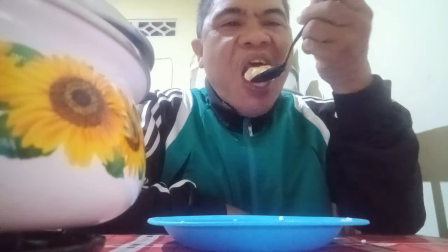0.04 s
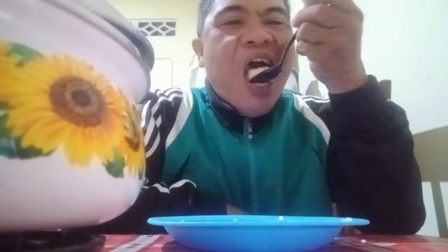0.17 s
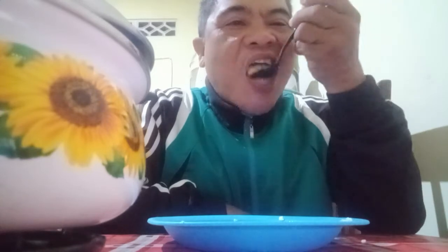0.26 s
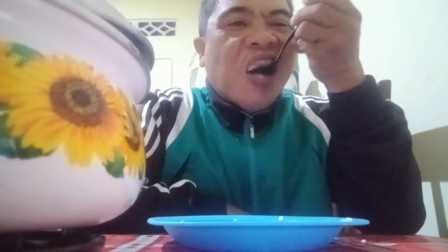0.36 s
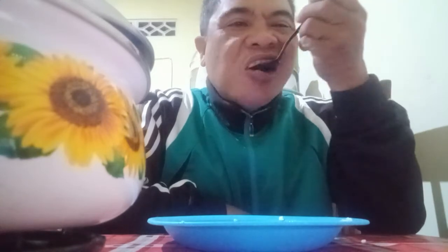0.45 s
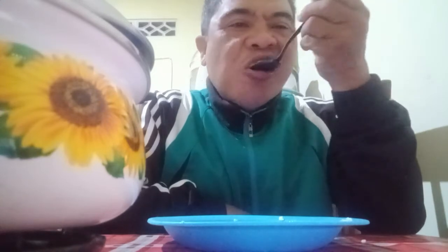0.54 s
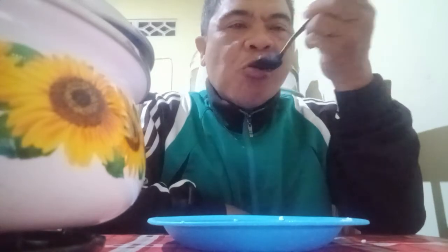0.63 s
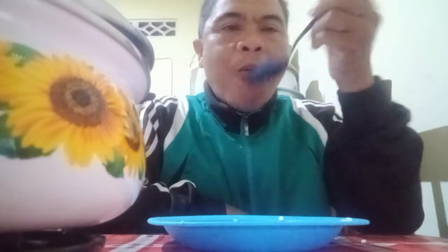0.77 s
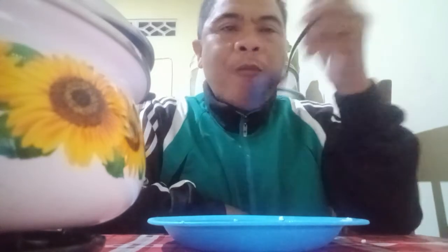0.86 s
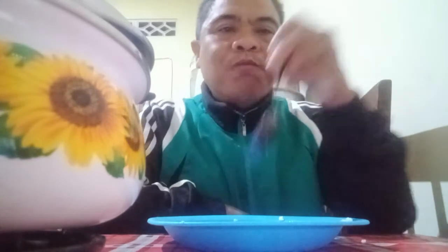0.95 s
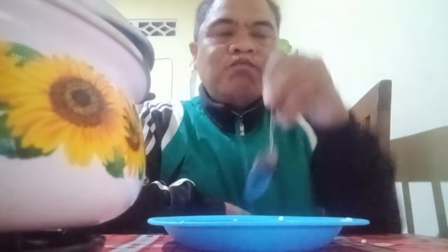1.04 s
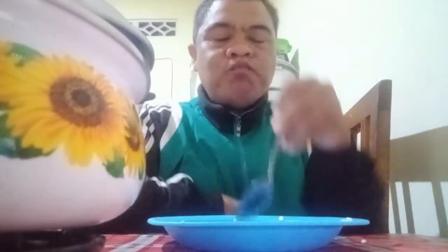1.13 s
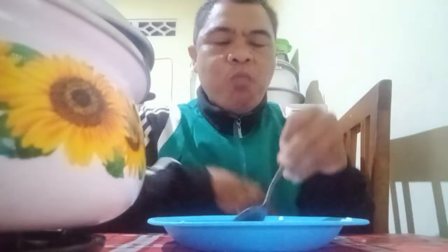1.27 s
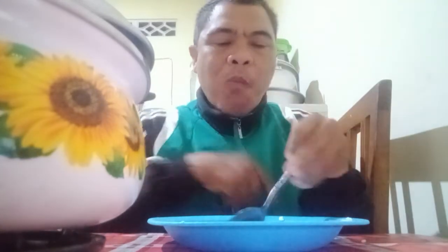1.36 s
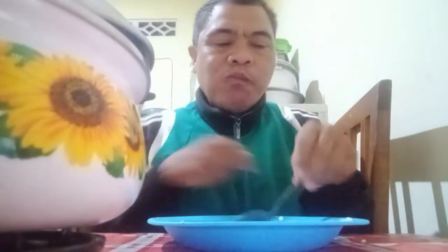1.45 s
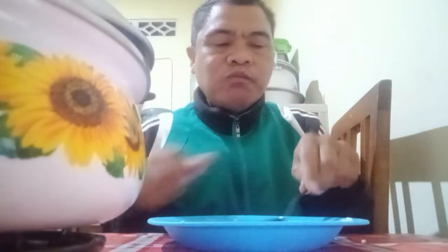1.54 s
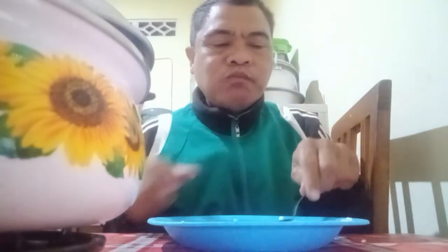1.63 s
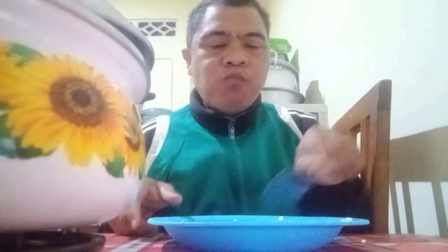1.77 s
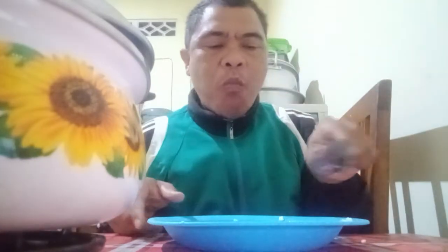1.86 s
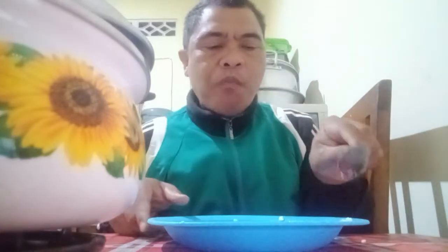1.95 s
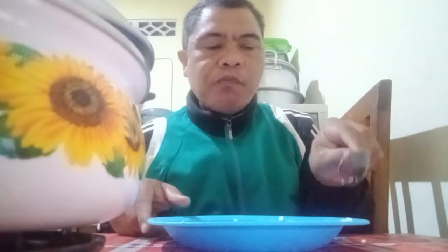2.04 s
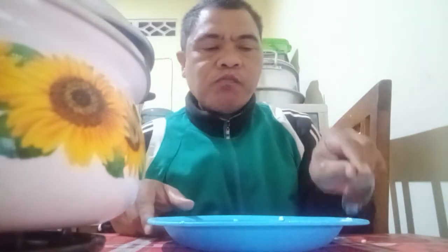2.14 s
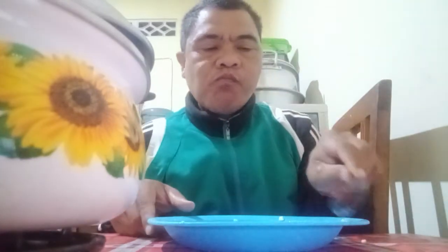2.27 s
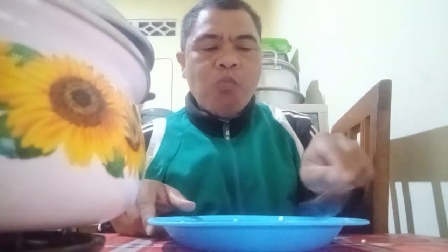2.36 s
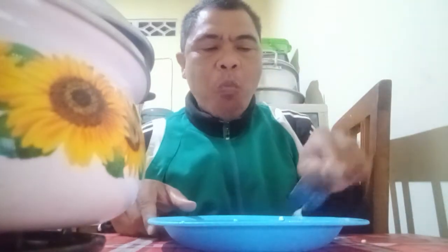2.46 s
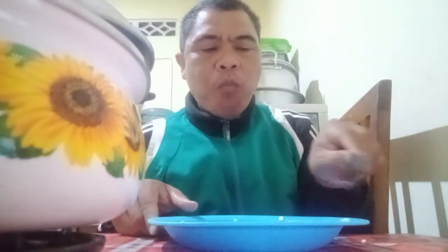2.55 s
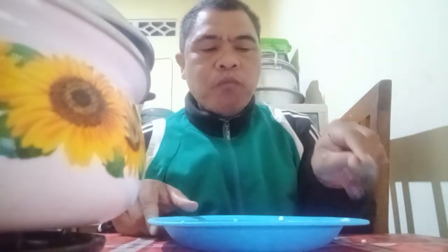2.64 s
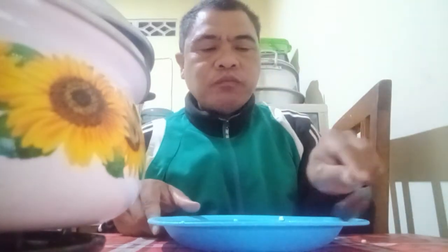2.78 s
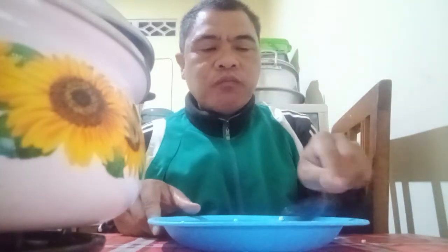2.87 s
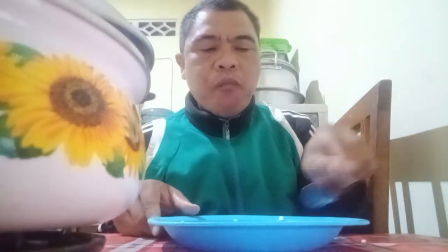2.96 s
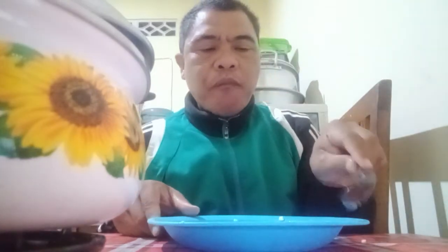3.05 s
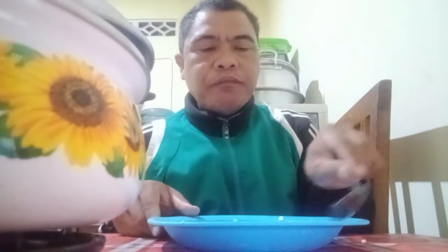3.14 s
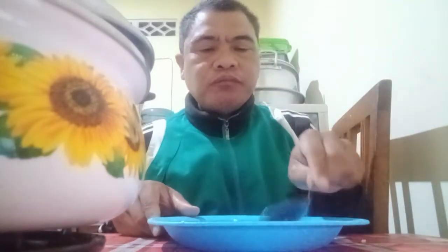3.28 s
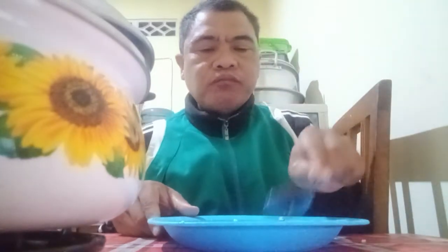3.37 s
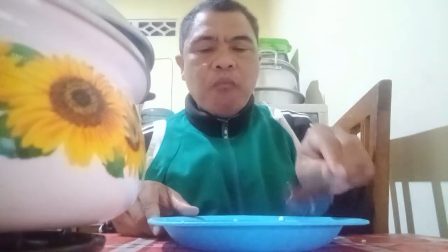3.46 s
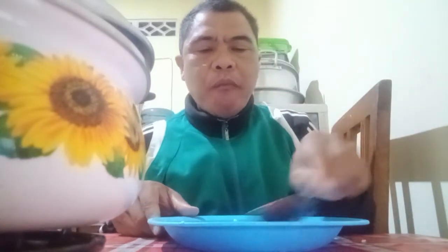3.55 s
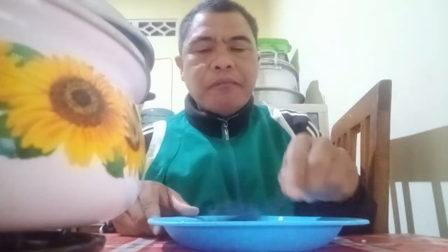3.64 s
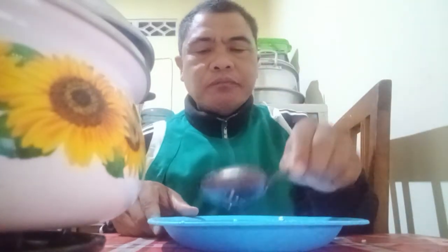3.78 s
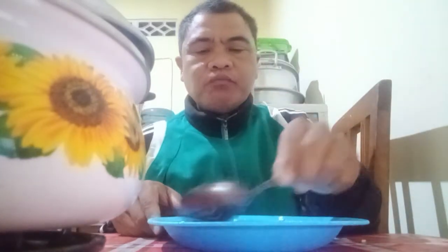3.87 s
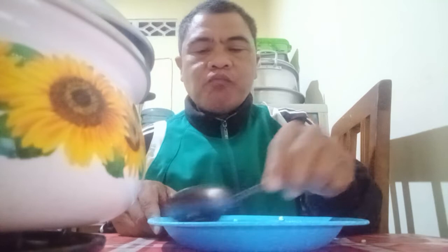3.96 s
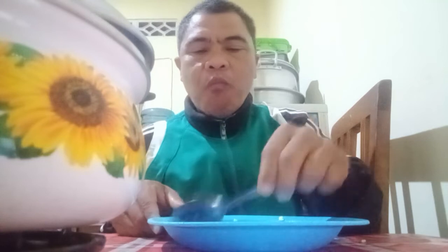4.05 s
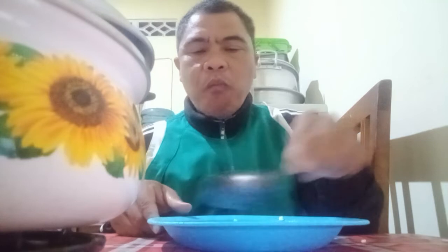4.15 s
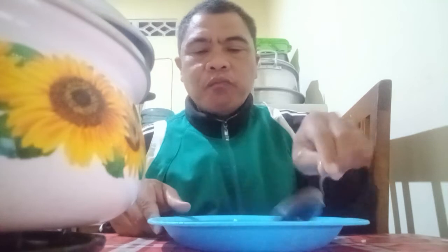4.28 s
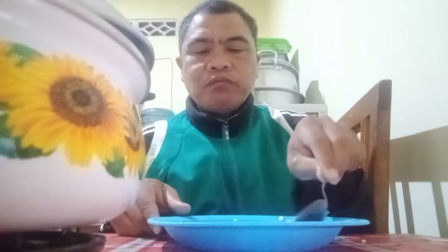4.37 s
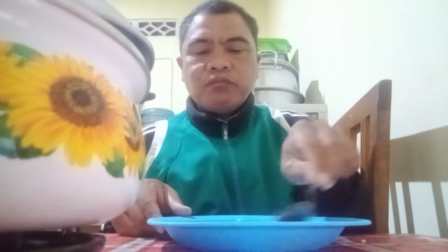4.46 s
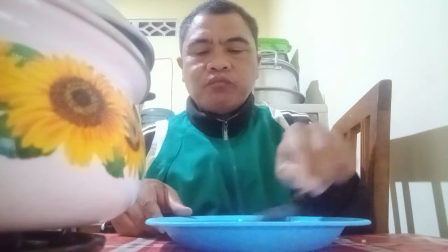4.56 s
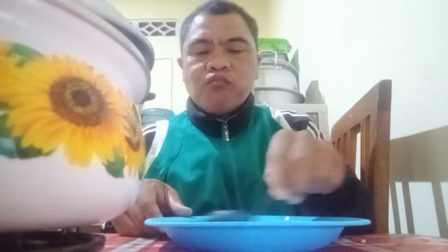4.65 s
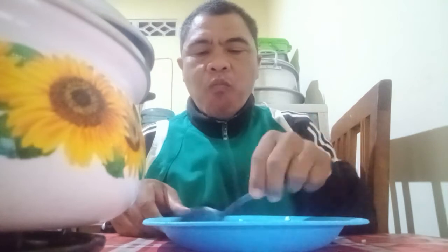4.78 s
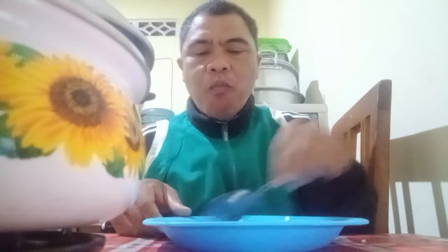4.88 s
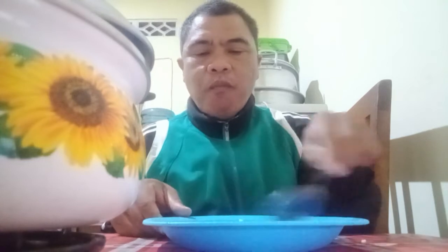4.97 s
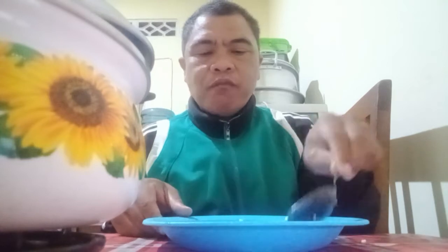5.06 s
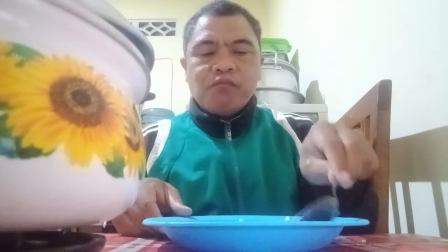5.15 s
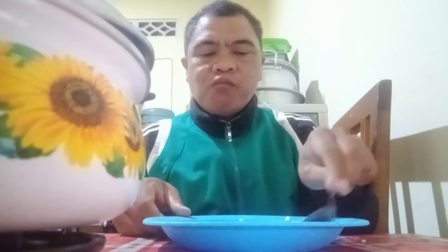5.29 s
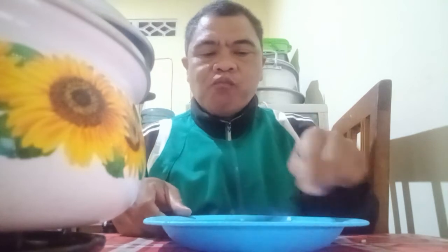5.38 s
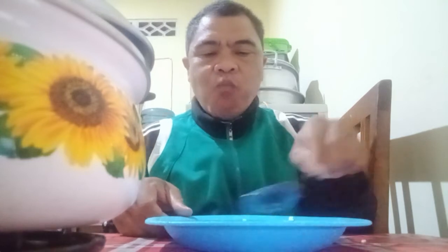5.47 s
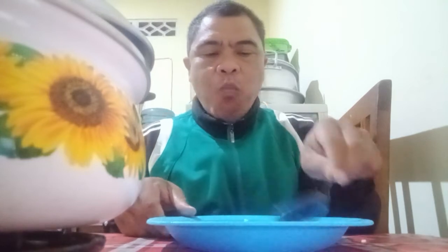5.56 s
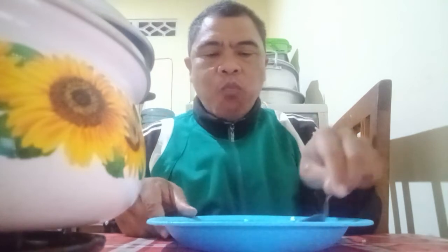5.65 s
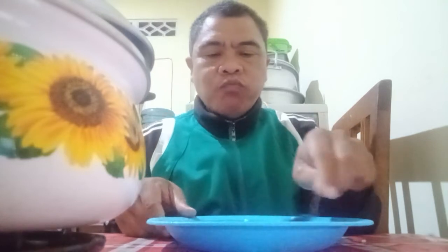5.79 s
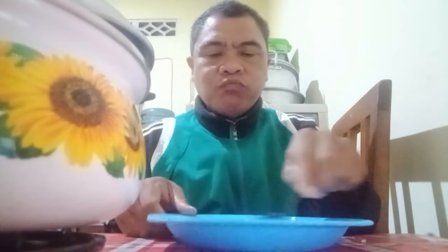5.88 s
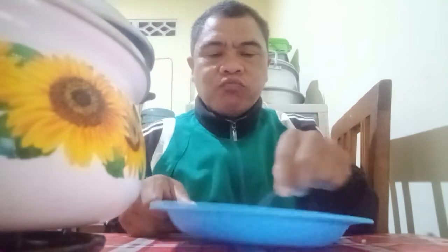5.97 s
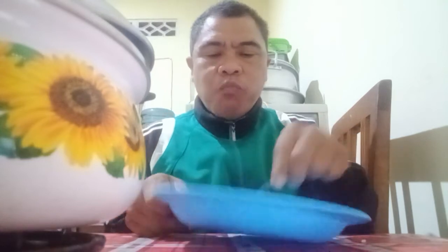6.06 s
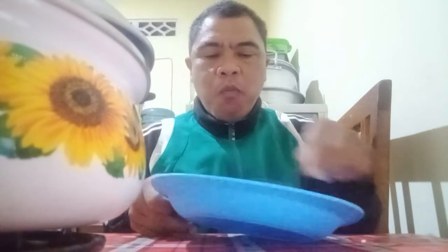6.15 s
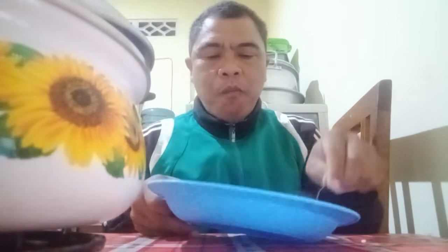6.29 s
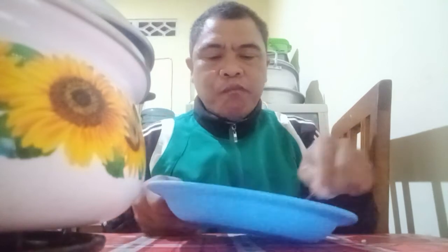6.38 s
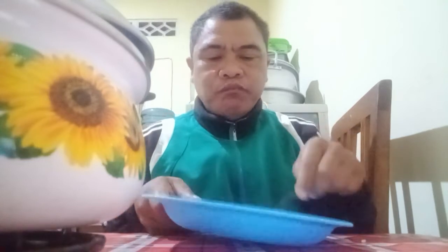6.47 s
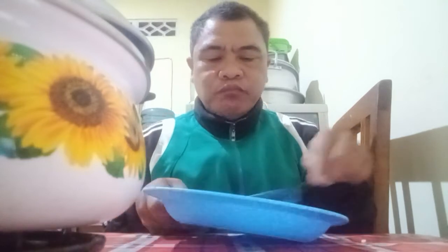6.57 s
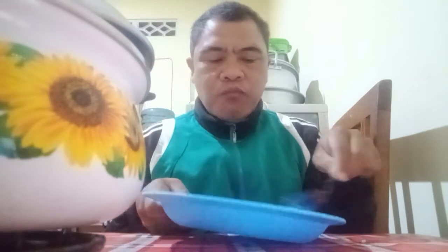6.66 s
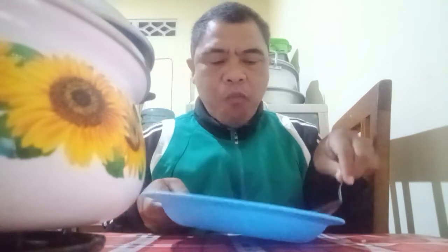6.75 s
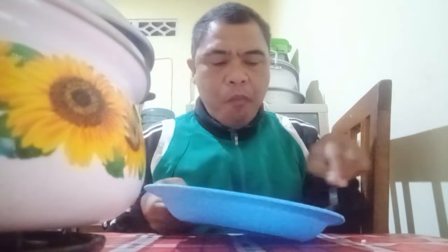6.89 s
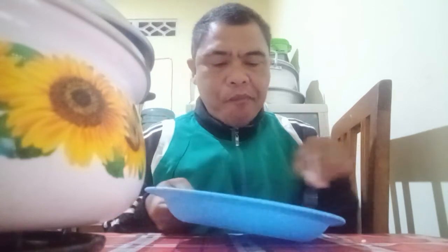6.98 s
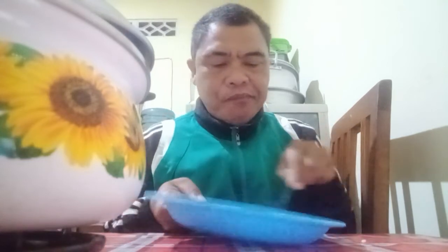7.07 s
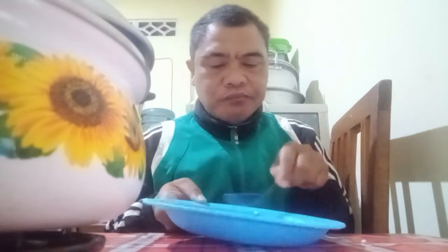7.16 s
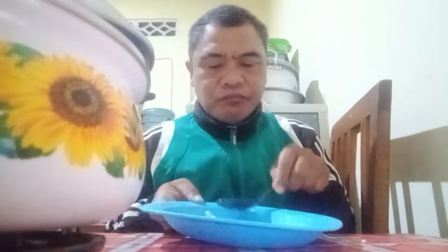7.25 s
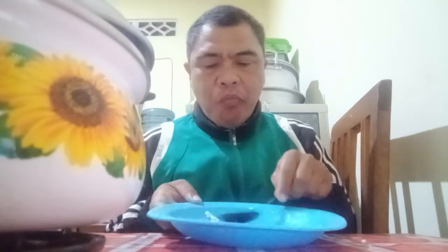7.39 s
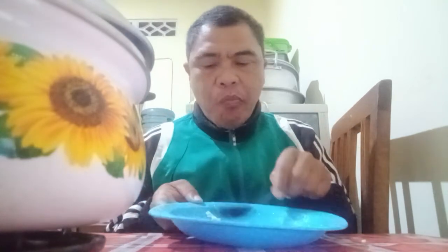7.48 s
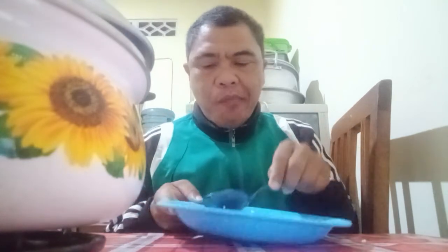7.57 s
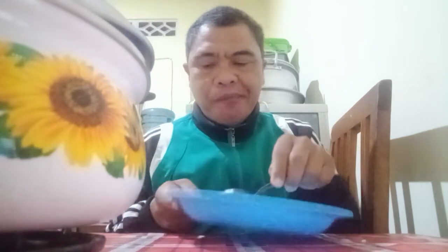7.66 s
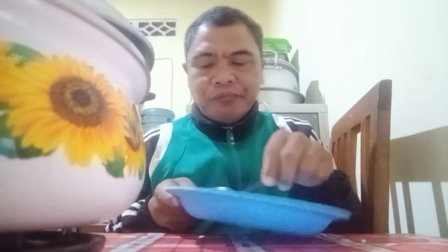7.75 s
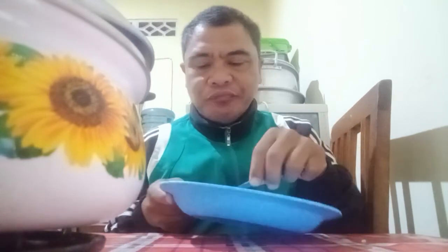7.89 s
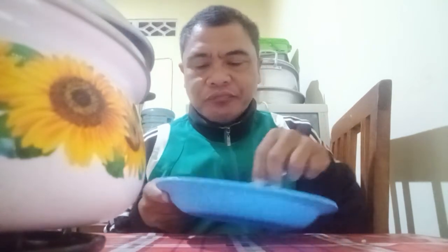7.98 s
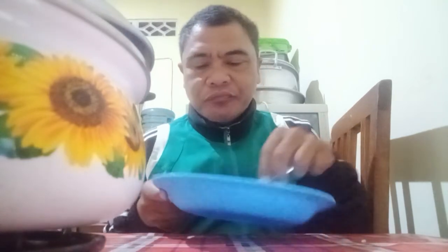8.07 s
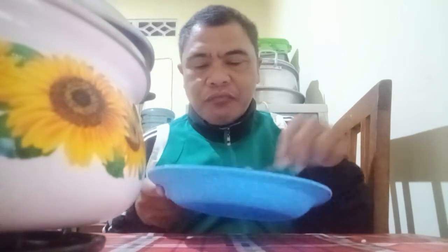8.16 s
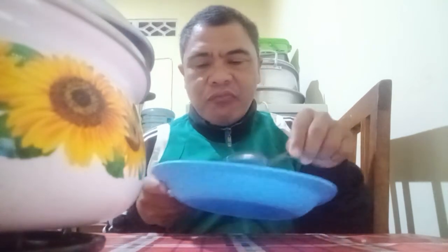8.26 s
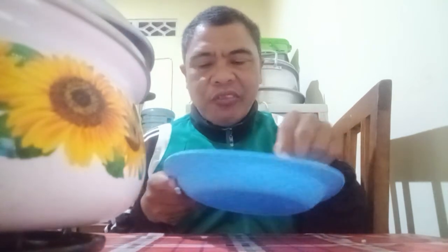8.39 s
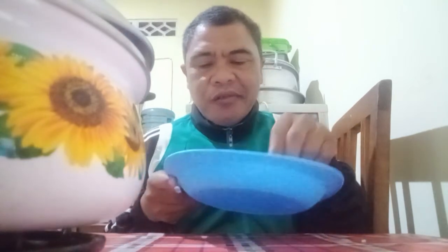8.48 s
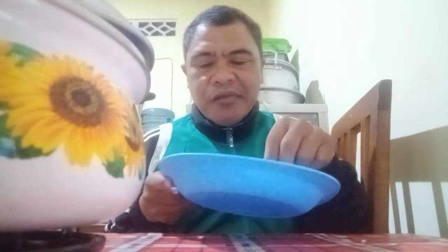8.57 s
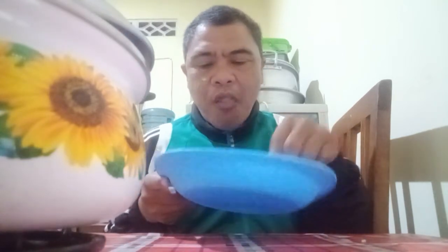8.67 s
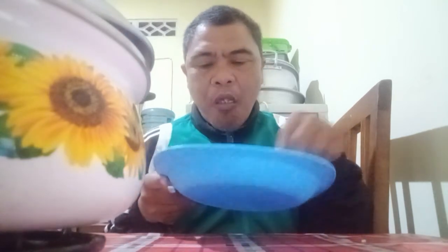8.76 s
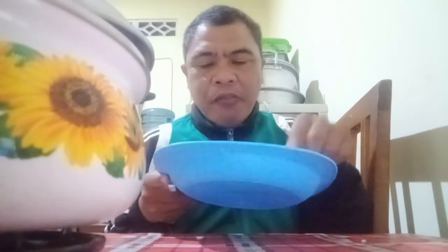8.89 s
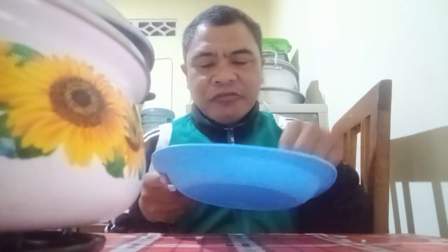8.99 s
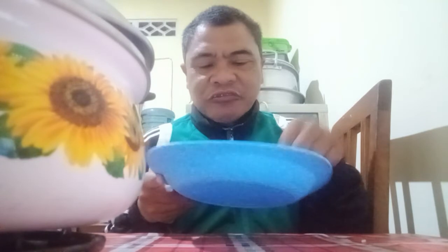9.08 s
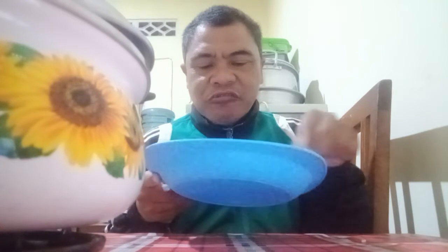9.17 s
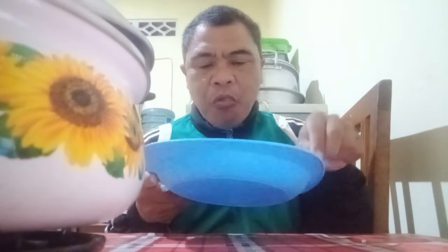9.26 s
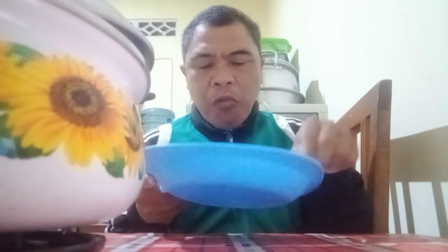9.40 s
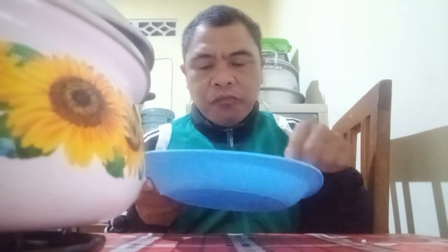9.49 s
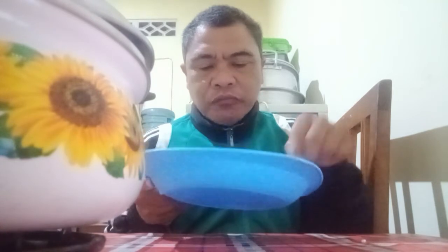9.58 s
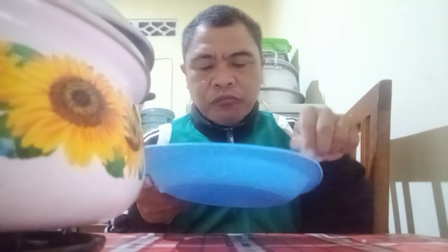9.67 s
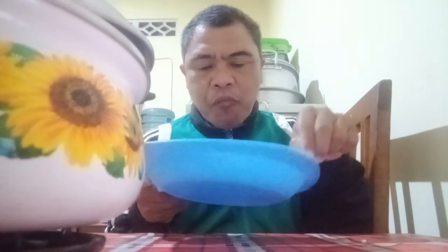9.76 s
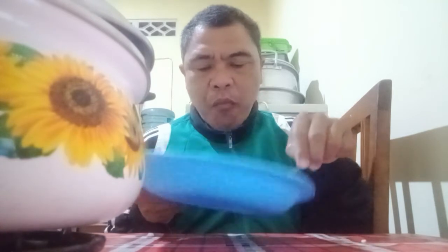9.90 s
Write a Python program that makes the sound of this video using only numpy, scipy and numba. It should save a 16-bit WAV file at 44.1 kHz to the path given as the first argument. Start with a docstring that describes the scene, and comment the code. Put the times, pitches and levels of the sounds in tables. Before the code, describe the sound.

A metal spoon scrapes a plastic plate in short, spaced strokes with small ticks, over steady hiss in a small hard room.

```python
"""A metal spoon gathers the last of a meal from a plastic plate, in a small hard-walled room.
It lands with ticks and drags in short strokes: tiny slips ring the plate and, faintly, the spoon.
A few mouth clicks come first, made of short skids given a bright colour and a thin clink.
Short swells of low noise give a few soft thumps, low body under some scrapes and faint rumbles.
Behind it all is a hiss of shaped noise, whose lower part wavers a little."""
import sys
import numpy as np
from scipy import signal
from scipy.fft import rfft, irfft
from scipy.io import wavfile
from numba import njit

SR = 44100
rng = np.random.default_rng(int(sys.argv[2]) if len(sys.argv) > 2 else 0)


def bounce(signal):
    """Save signal as a 16-bit WAV file at the path given by the first command-line argument."""
    frames = np.transpose(np.atleast_2d(signal))
    limited = np.clip(frames, -1, 1)
    pcm = np.round(limited * 32767).astype(np.int16)
    wavfile.write(sys.argv[1], SR, pcm)


N = 437913  # length of the scene in samples

# Strokes of the spoon. Its place and angle share the push among the mode families; its bite sets the treble.
# Each row: start in seconds, rise in seconds, hold in seconds, force as bowl level in dB before the scene's
# scrape level, swell through the rise in dB, lean through the hold in dB, rim, grit and flex each in dB
# relative to the bowl, crest of the rasp in dB, favoured bowl resonance in Hz, lift of the highest modes
# in dB, tilt of the top treble in dB per octave.
STROKES = [ (1.219, 0.053, 0.017, -46, 6, -3.5, 9, 6.5, -14, -5.5, 1120, 0, 1),
           (2.734, .06, 0.018, -39, 16, 6.5, 2, -14.5, -18, 5, 870, 4, 7),
           (3.171, 0.022, 0.0065, -39.5, 8, -1.5, 2.5, -7.5, -19, 3.5, 1040, 1, 8),
           (3.503, 0.074, 0.021, -41.5, 22, 3.5, 13.5, 8, -9, 10, 1120, -6.5, -0.5),
           (3.906, 0.056, .056, -24.5, 18, 2, 0.5, -1, -24.5, 5.5, 1270, -5, 1.5),
           (4.479, 0.11, 0.16, -24, 32, 2, -2.5, -1, -14, 5, 1050, 4, -2.5),
           (4.698, 0.053, 0.066, -27.5, 16, 2.5, 8.5, 3.5, -1.5, -0.5, 1070, 2, -11),
           (5.297, 0.044, 0.028, -24.5, 28, 6.5, 1.5, 0, -17, 3.5, 1180, -3, 1.5),
           (5.85, .1, .09, -20, 30, 5, -6.5, -12.5, -28, -7, 1220, -7, -16),
           (6.378, 0.038, 0.048, -25, 7, -0.5, -4.5, -9.5, -11.5, 9.5, 1085, -6, 4),
           (6.832, 0.12, 0.098, -30, 38, -7, -0.5, -2, -20.5, 3, 1040, -7.5, 3.5),
           (7.209, 0.049, 0.13, -33.5, 14, 5, -5.5, -9, -14, 4.5, 870, -2, 5),
           (7.679, .01, 0.067, -28.5, 14, -5, -9.5, -14, -24, -2, 1020, -1, 3),
           (7.778, 0.036, 0.081, -24.5, 19, -0.5, -11.5, -7, -16.5, -2, 1018, 0, -6),
           (7.859, 0.066, 0.099, -21.5, 16, -3, -8.5, -7.5, -18, -4, 1060, 0.5, -8.5),
           (8.428, .008, .04, -45.5, 2, 1, -24, -18, -9.5, 8, 955, 2, -3),
           (8.48, 0.074, 0.06, -25, 31, 3.5, -5, -14.5, -15, 9.5, 1020, -1.5, -8),
           (8.891, 0.055, 0.039, -30.5, 26, 9.5, -6, -15, 0, 7, 1050, -6, -10),
           (9.299, 0.051, 0.077, -28.5, 18, 9.5, -6.5, -11.5, -6, -1, 1010, -6, 0),
           (9.389, 0.057, 0.012, -21.5, 20, 1, -10.5, -15.5, -12, 5.5, 1110, -1, -5),
           (9.762, 0.079, 0.089, -34, 13, -3.5, -8.5, -16, -11, -1, 960, -0.5, 0)]

# The plate's ways of ringing (modes), by family: the whole plate bending, its bowl, its rim, and fine grit.
# Each row: pitch in Hz, width in Hz, relative strength in dB.
FLEX_MODES = [(396, 55, 4.5), (593.4, 23, 7.5), (679, 130, 6.5)]
BOWL_MODES = [(900, 125, -1), (968, 52, 6.5), (1050, 50, 6), (1070, 53, -10.5), (1274, 140, -8)]
RIM_MODES = [(1438, 36, 14), (1626, 165, 15), (1743, 124, 13.5), (1837, 49, 12), (1995, 50, 2),
             (2230, 95, 0)]
GRIT_MODES = [(2770, 150, 6), (3100, 260, 8), (3220, 180, 0.5), (3295, 260, 10), (3740, 200, 1.5),
              (5430, 690, 8), (6600, 150, 2), (8160, 170, -7)]

# The crowded high modes, blended into a rasp. Each row: frequency in Hz, relative level in dB.
RASP_SPECTRUM = [(2200, 4), (2500, -9.5), (3600, -14), (4350, 5.5), (5200, 8), (7000, 6.5), (8700, 2),
                 (9600, -4.5), (12000, -6), (13500, -20.5), (15500, -14.5)]

# The spoon's thin ring. Each row: pitch in Hz, width in Hz, relative strength in dB.
SPOON_MODES = [(5077, 14, -6), (5330, 16, -6), (9068, 12, 0), (11420, 20, -7), (12050, 18, -5)]

# Moments when the spoon lands or catches. Each row: start in seconds, blow as bowl level in dB before a
# shared boost, rim and grit each in dB relative to the bowl, lift of the highest modes in dB.
TAPS = [(1.2255, -48, 16, 20.5, 9), (2.7339, -49.5, 6, -14, 5), (3.176, -50.5, 17, 7.5, 9),
        (3.1985, -41.5, 15, -1.5, -13), (3.4995, -40.5, 14.5, 15, -3.5), (3.9068, -43.5, 15, 16, 12),
        (3.990, -28, -1, 10, -1), (4.091, -44, 13, 8.5, 0), (4.3888, -63, 21, 24.5, 0),
        (4.532, -43.5, 17.5, 7, 4), (5.306, -39.5, 7.5, -6.5, 12), (5.679, -42.5, 16, 11.5, -2.5),
        (6.012, -26, 5, -7.5, 0), (6.3776, -30.5, -5, -6, -2), (6.824, -64.5, 17, 10, 5),
        (6.867, -56, 14, 5, 2), (7.2484, -26.5, -11, 2, -1), (7.676, -24, -6, -3.5, 2.5),
        (7.7372, -45, 6, 8.5, 6), (7.805, -33, -18, -4, 9), (7.9235, -20, -19, -1.5, -4),
        (8.429, -43, -20, -9, -4), (8.893, -51, 7, -3, -1), (8.942, -34, 0, -22, -4),
        (9.305, -39.5, -8, 2.5, 8), (9.359, -29, -18, -17, 7), (9.763, -42.5, -9, -3, -3),
        (9.817, -28, -15, -34, -3), (9.886, -28, -14, -24, 1)]

# Clicks of mouth and teeth on the spoon. Each row: start in seconds, then click and spoon clink,
# each in dB before a shared boost.
CLICKS = [(0.241, -41, -40), (0.349, -43.5, -59), (0.536, -44.5, -72), (0.554, -42, -67)]

# The colour of a click. Each row: frequency in Hz, relative level in dB.
CLICK_SPECTRUM = [(1500, -25), (3000, 3), (4600, -19), (8000, 5), (9500, -6), (11300, 5), (13000, -7),
                  (15000, -2)]

# The spoon's clink at the teeth. Each row: pitch in Hz, width in Hz, relative strength in dB.
CLINK_MODES = [(2780, 9.2, 5), (3810, 27, -5), (8250, 130, -3), (10800, 35, 0), (14500, 80, -2)]

# Short swells of low noise: a few soft thumps, low body under some scrapes, faint rumbles in the background.
# Each row: start in seconds, level of the noise before its swell in dB, pitch in Hz,
# width of each of two filter passes in Hz, length in seconds (the peak comes halfway).
LOW_SWELLS = [(0.414, -52, 900, 180, 0.05), (0.82, -49, 840, 560, 0.025), (0.821, -53, 324, 42, 0.032),
              (0.971, -45, 104, 46, 0.022), (1.31, -53, 109, 53, 0.037), (1.856, -53.5, 627, 110, 0.096),
              (2.243, -59.5, 87, 54, 0.16), (3.196, -52, 436, 61, 0.029), (5.476, -55, 75, 31, 0.076),
              (5.788, -51, 76, 25, 0.034), (6.229, -58.5, 78.5, 34, 0.23), (6.923, -39, 390, 210, 0.063),
              (7.095, -45.5, 617, 65, 0.047), (7.818, -41, 367, 650, 0.038), (7.82, -41, 96, 66, 0.02),
              (8.504, -51, 332, 69, 0.075), (8.895, -39.5, 457, 81, 0.067), (9.807, -52.5, 406, 89, 0.085)]

# Room and microphone hiss. Each row: frequency in Hz, relative level in dB per Hz.
HISS_SPECTRUM = [(30, -18), (75, -4.5), (160, 4.5), (300, -2.5), (700, -0.5), (1100, -1), (1500, 5),
                 (2200, -7.5), (3300, -9), (4200, -23), (5500, -15), (7800, -6.5), (10400, -17),
                 (11100, -29.5), (15500, -35)]

HISS_DB = -52.5
TOP_HZ = 15850  # the phone cuts what lies above
EASE_DB, EASE_S = 7.5, 0.015  # after the hold the spoon lets go: a quick drop ...
RELEASE_DB_PER_S, RELEASE_S = 192.5, 0.24  # ... and a steady fade as it slides out
RIM_GROWTH, GRIT_GROWTH, FLEX_GROWTH = 0.79, 1.03, 1.09  # dB of each family per dB of push
TREMOR_DB, TREMOR_RATE = 1.0, 38.9  # the drag is uneven: chance scale in dB, changes per second
TAP_FLEX_DB = -20  # a short blow hardly bends the whole plate (flex relative to bowl)
CREST_SHARE, CREST_WIDTH_S = 0.71, 0.019  # late in the hold the edge digs in and the rasp changes by its crest
CREST_RIM = 0.12  # the rim's share of that crest


def scrapes(families, favour_width_hz=150, fade_s=0.0016):
    """Each stroke drives all families with the same slips; the place of contact favours one part of the bowl."""
    out = np.zeros(N)
    lead = len(families[0])  # the plate is already ringing when the kept part begins
    for (s, rise_s, hold_s, force_db, swell_db, lean_db, rim_db, grit_db, flex_db,
         crest_db, favoured_hz, lift_db, tilt_db) in STROKES:
        t = np.arange(0, rise_s + hold_s + RELEASE_S, 1 / SR)
        count = len(t)

        push_db = effort(t, rise_s, hold_s, swell_db, lean_db)
        push_db = push_db + TREMOR_DB * walk(SR, TREMOR_RATE)[:count]
        crest_s = rise_s + CREST_SHARE * hold_s
        dig_db = crest_db * np.exp(-((t - crest_s) / CREST_WIDTH_S) ** 2)

        drive = sliding(slips(SR), lead, count)
        drive = bite(drive, lift_db, tilt_db)
        bowl, rim, grit, flex = (signal.fftconvolve(drive, family)[lead:lead + count] for family in families)
        bowl = resonate(bowl, np.full(count, float(favoured_hz)), float(favour_width_hz))

        sound = (driven(bowl, push_db)
                 + driven(rim, rim_db + RIM_GROWTH * push_db + CREST_RIM * dig_db)
                 + driven(grit, grit_db + GRIT_GROWTH * push_db + dig_db)
                 + driven(flex, flex_db + FLEX_GROWTH * push_db))
        contact = np.clip(np.minimum(t, t[-1] - t) / fade_s, 0, 1)  # short fade at both ends
        add(out, s, sound * undb(force_db) * contact)
    return out


def effort(t, rise_s, hold_s, swell_db, lean_db):
    """Push of one stroke in dB relative to mid-hold: it swells, leans, lets go and fades."""
    swell = swell_db * np.minimum(t / rise_s - 1, 0)
    lean = lean_db * (np.clip((t - rise_s) / hold_s, 0, 1) - .5)
    after = np.maximum(t - rise_s - hold_s, 0)
    ease = EASE_DB * np.minimum(after / EASE_S, 1)
    return swell + lean - ease - RELEASE_DB_PER_S * after


def slips(n, rate=4200, scatter_db=4, chatter_hz=260, chatter_db=2.5):
    """Stick and slip: tiny releases of uneven size, about rate a second, made uneven by the spoon's chatter."""
    releases = (rng.random(n) < rate / SR) * rng.choice([-1, 1], n)
    size_db = scatter_db * rng.standard_normal(n) + chatter_db * walk(n, chatter_hz)
    return releases * undb(np.minimum(size_db, 9))  # the grip can hold only so much


def sliding(drive, start, count, order=6):
    """The spoon slides over a few spots in each stroke, so the pattern of woken modes shifts."""
    place = order * np.clip((np.arange(len(drive)) - start) / count, 0, 1)
    out = np.zeros(len(drive))
    for spot in range(order + 1):
        share = np.sqrt(np.maximum(1 - abs(place - spot), 0))
        out += signal.fftconvolve(drive * share, contact_point())[:len(drive)]
    return out


def contact_point():
    """Every spot on the plate wakes some modes and misses others: random peaks and dips in pitch."""
    return causal(patches(12, 115))


def bite(x, lift_db, tilt_db=0, lift_hz=4400, tilt_hz=7000):
    """The sharpness of the contact lifts or lowers the highest modes and tilts the top treble."""
    hz = np.arange(len(x) // 2 + 1) * SR / len(x)
    step = (1 + np.tanh((hz - lift_hz) / 400)) / 2
    octaves_above = np.log2(np.maximum(hz / tilt_hz, 1))
    return irfft(rfft(x) * undb(lift_db * step + tilt_db * octaves_above), len(x))


def driven(x, db):
    """Make a ringing follow a level curve, with the curve's total energy."""
    gain = undb(db)
    return level(x * gain) * np.sqrt(np.mean(gain ** 2))


def plate(rasp_db=-2, spoon_db=-20):
    """How the four mode families ring after one push: bowl, rim, grit (with the spoon's ring) and flex."""
    bowl = band(modes(BOWL_MODES), 760, 1740, order=4)
    rim = band(modes(RIM_MODES), 1335, 2383)
    single = unit(band(modes(GRIT_MODES), 2200, 7680))
    rasp = undb(rasp_db) * unit(band(colour(RASP_SPECTRUM), 3480, 17000))
    spoon = undb(spoon_db) * modes(SPOON_MODES)
    grit = single + rasp + spoon
    flex = band(modes(FLEX_MODES), 460, 713, order=4)
    return [unit(family) for family in (bowl, rim, grit, flex)]


def taps(families, blow_db=23):
    """The spoon strikes the same modes that it scrapes, each time at a new spot."""
    out = np.zeros(N)
    margin = 32  # samples of room for the bite filter, which spreads both ways in time
    for s, db, rim_db, grit_db, lift_db in TAPS:
        push = signal.fftconvolve(contact_point(), skid(ring_s=0.003, share=2.2))
        push = bite(np.pad(push, margin), lift_db)
        shares = undb([0, rim_db, grit_db, TAP_FLEX_DB])
        ring = sum(share * unit(signal.fftconvolve(push, family)) for share, family in zip(shares, families))
        add(out, s - margin / SR, undb(db + blow_db) * ring)
    return out


def skid(ring_s, share, size=1024):
    """A contact: one sharp push and a few milliseconds of fine skidding, as dying noise."""
    fading = np.exp(-np.arange(size) / SR / ring_s)
    push = share * unit(rng.standard_normal(size) * fading)
    push[0] += 1
    return unit(push)


def mouth(click_db=23):
    """Tiny bright clicks as the lips take the bite; a touch of the teeth makes the spoon clink."""
    out = np.zeros(N)
    for s, db, clink_db in CLICKS:
        ring = undb(db) * colour(CLICK_SPECTRUM) + undb(clink_db) * modes(CLINK_MODES)
        click = signal.fftconvolve(ring, skid(ring_s=0.0091, share=1))
        add(out, s, undb(click_db) * click)
    return out


def low_swells():
    """Soft thumps, low body and faint rumbles: noise in a low band that swells and dies away."""
    out, t = np.zeros(N), np.arange(SR // 2) / SR
    for s, db, hz, width, length in LOW_SWELLS:
        centre = np.full(len(t), float(hz))
        rumble = resonate(rng.standard_normal(len(t)), centre, float(width))
        rumble = resonate(rumble, centre, float(width))
        age = 2 * t / length
        swell = age * np.exp(1 - age)  # reaches 1 at half the length
        add(out, s, level(band(rumble, 65, 3000), db) * swell)
    return out


def room(x, wet_db=-9, gap_s=0.006, low_t60=0.16, mid_t60=0.29, high_t60=0.25):
    """Close walls answer within milliseconds as dying noise; the middle pitches ring longest."""
    t = np.arange(SR // 2) / SR
    # each zone: lowest Hz, highest Hz, seconds to fade by 60 dB
    zones = [(60, 610, low_t60), (828, 2810, mid_t60), (2690, 21500, high_t60)]
    tail = np.zeros(len(t))
    for lo, hi, t60 in zones:
        tail += band(rng.standard_normal(len(t)), lo, hi) * np.exp(-np.log(1000) * t / t60)
    return undb(wet_db) * signal.fftconvolve(x, unit(tail * (t > gap_s)))[:N]


def hiss(ripple_db=4, ripple_hz=110, waver_db=3.5, waver_rate=9):
    """Shaped noise, rippled along pitch by the room; its lower bands waver each on their own."""
    spectrum = rfft(rng.standard_normal(N)) * gains(HISS_SPECTRUM, N)
    spectrum = spectrum * patches(ripple_db, ripple_hz, size=N)
    hz = np.arange(len(spectrum)) * SR / N
    edges = 50 * np.sqrt(2) ** np.arange(13)  # half-octave bands up to 3200 Hz
    zone = np.searchsorted(edges, hz)
    low = np.zeros(N)
    for k in range(len(edges)):
        low += irfft(spectrum * (zone == k), N) * undb(waver_db * walk(N, waver_rate))
    high = irfft(spectrum * (zone == len(edges)), N)
    return level(low + high, HISS_DB)


def undb(db):
    """Turn decibels into a plain multiplier."""
    return 10 ** (np.asarray(db) / 20)


def level(x, db=0):
    """Set the average (rms) level."""
    return x * undb(db) / np.sqrt(np.mean(x ** 2))


def unit(response):
    """Scale a response so that its total energy is 1."""
    return response / np.sqrt(np.sum(response ** 2))


def add(out, s, x):
    """Mix x in at time s, in seconds."""
    i = int(s * SR)
    out[i:i + len(x)] += x[:len(out) - i]


def band(x, lo_hz, hi_hz, order=3):
    """Keep the pitches between two limits (Butterworth band-pass)."""
    limits = [lo_hz, min(hi_hz, SR / 2 - 1)]
    return signal.sosfilt(signal.butter(order, limits, "band", fs=SR, output="sos"), x)


def gains(points, size):
    """Join (Hz, dB) points into a multiplier for each frequency of a transform."""
    hz, db = np.transpose(points)
    bins_hz = np.arange(size // 2 + 1) * SR / size
    return undb(np.interp(np.log(bins_hz + 1), np.log(hz), db))


def colour(points, size=8192):
    """Short response with the given (Hz, dB) spectrum."""
    return causal(gains(points, size))


def causal(gain):
    """Unit-energy response with these gains and the earliest possible attack (minimum phase)."""
    cepstrum = irfft(np.log(gain))
    cepstrum[1:len(gain) - 1] *= 2
    cepstrum[len(gain):] = 0
    return unit(irfft(np.exp(rfft(cepstrum))))


def patches(depth_db, spacing_hz, size=8192):
    """Random peaks and dips along frequency, as multipliers; shallower below 2000 Hz."""
    hz = np.arange(size // 2 + 1) * SR / size
    heights = rng.uniform(-1, 1, size)
    shape = np.interp(hz / spacing_hz, np.arange(size), heights)
    return undb(depth_db * np.minimum(hz / 2000, 1) * shape)


def modes(table, size=8192):
    """Unit-energy sum of dying tones; a wider mode dies sooner."""
    t = np.arange(size) / SR
    ring = np.zeros(size)
    for hz, width, db in table:
        ring += undb(db) * width * np.exp(-np.pi * width * t) * np.cos(2 * np.pi * hz * t)
    return unit(ring)


def walk(n, rate):
    """Chance values, rate a second, joined by straight lines; their spread is near 1."""
    steps = np.arange(n) * rate / SR
    return np.interp(steps, np.arange(n), rng.standard_normal(n))


@njit
def resonate(x, hz, width):
    """Let one resonance ring (state-variable band-pass); its centre may move."""
    y, b, l = np.empty(len(x)), 0., 0.  # b and l are the filter's two memories
    for i in range(len(x)):
        g, k = np.tan(np.pi * hz[i] / SR), width / hz[i]
        v = (b + g * (x[i] - l)) / (1 + g * (g + k))
        b, l, y[i] = 2 * v - b, l + 2 * g * v, k * v
    return y


def scene(scrape_db=-1.01):
    """Spoon, plate, mouth and low swells in the room, over the hiss."""
    families = plate()
    near = undb(scrape_db) * scrapes(families) + taps(families) + mouth() + low_swells()
    return (near + room(near) + hiss())[None]


def record(dry):
    """The phone cuts the top: a steep low-pass (0.2 dB ripple, 80 dB down above it)."""
    return signal.sosfilt(signal.ellip(10, .2, 80, TOP_HZ, fs=SR, output="sos"), dry)


dry = scene()
out = record(dry)
bounce(out)
```